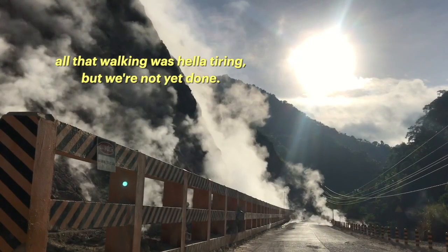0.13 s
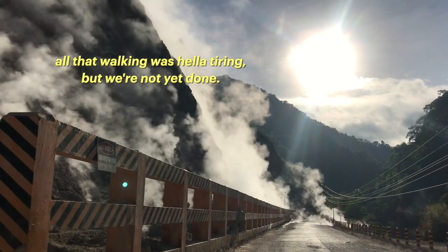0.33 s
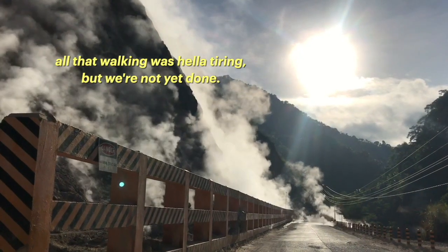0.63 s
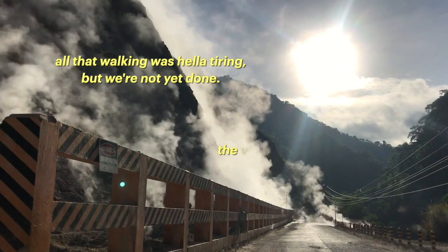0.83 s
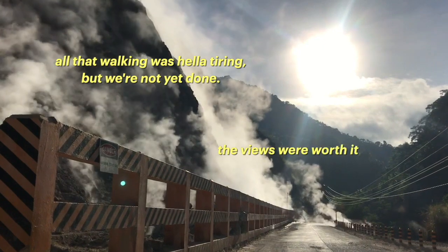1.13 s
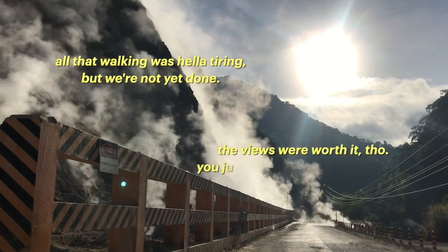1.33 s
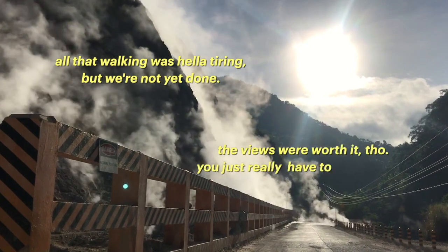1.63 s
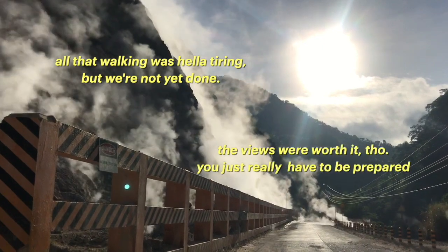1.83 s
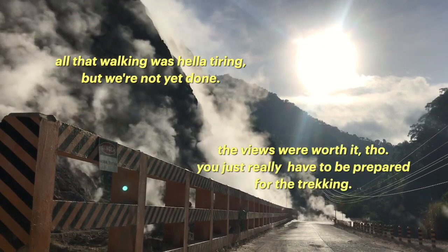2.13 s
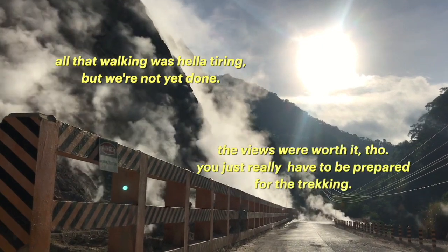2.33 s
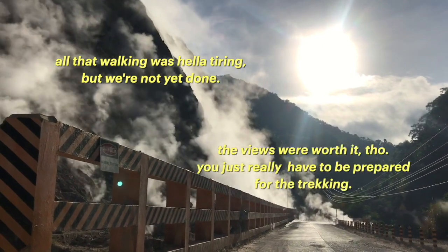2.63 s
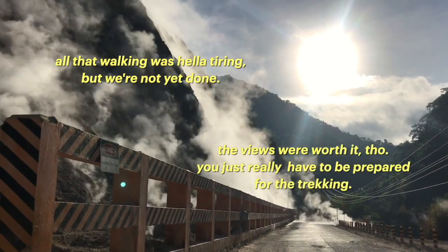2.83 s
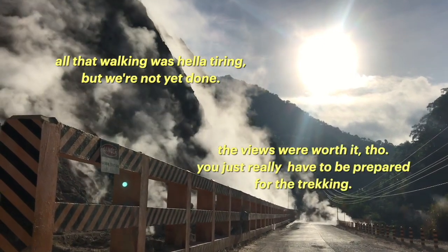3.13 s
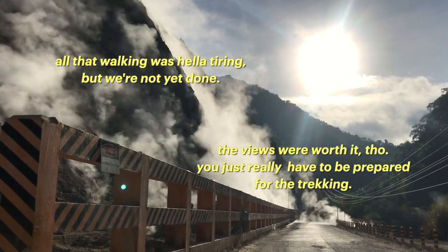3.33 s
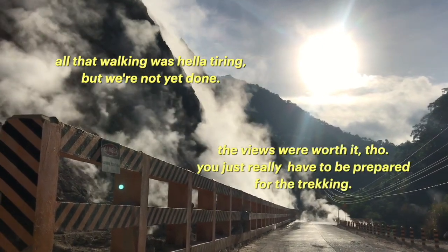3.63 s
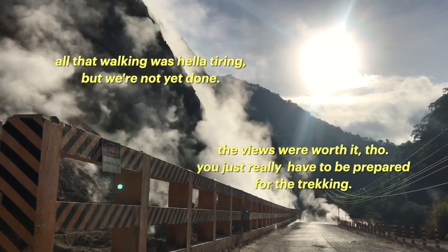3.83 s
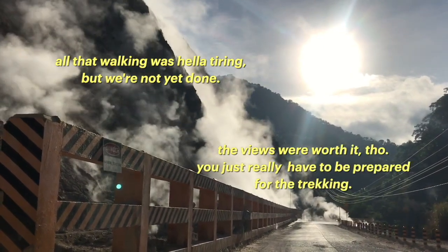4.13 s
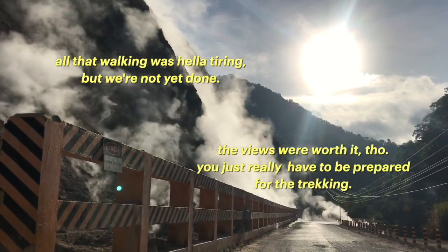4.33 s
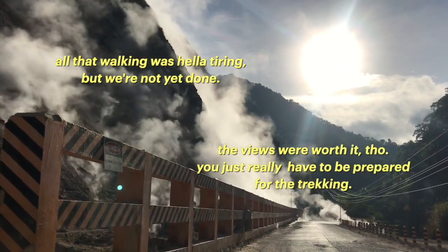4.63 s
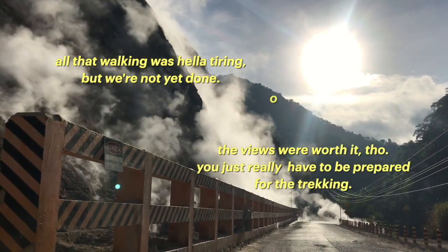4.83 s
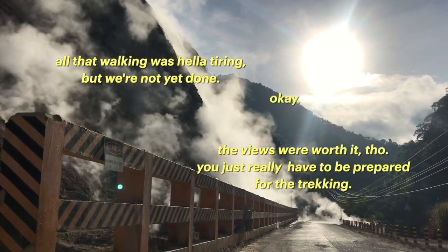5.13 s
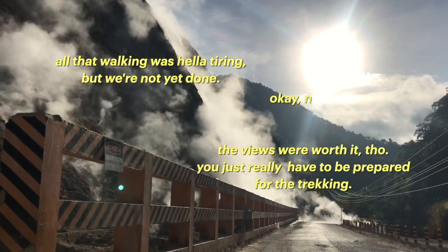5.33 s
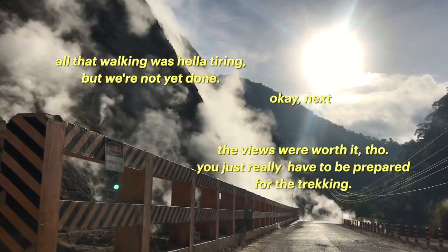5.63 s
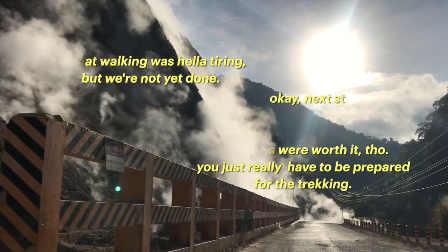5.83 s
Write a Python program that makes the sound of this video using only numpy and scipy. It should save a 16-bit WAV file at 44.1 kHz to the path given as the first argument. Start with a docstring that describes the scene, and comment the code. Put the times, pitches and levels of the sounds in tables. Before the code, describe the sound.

Steam rushes and hisses steadily outdoors over a low idling engine, with ticking water drops and faint bird whistles.

```python
"""A wet surge of spray, then the steady rush of steam from a hillside, heard from beside a mountain road.
The turbulent jets hiss and fizz, and spit drops that tick on the ground close by.
Some way off an engine drones at idle and picks up a little; small birds whistle through the hiss
and echo off the slope. Now and then a puff of air thumps the phone's microphone."""
import sys
import numpy as np
from scipy import signal
from scipy.fft import rfft, irfft
from scipy.io import wavfile

SR = 44100
rng = np.random.default_rng(int(sys.argv[2]) if len(sys.argv) > 2 else 0)


def generate_wav(sig):
    """Save sig (samples, or channels by samples) to the path in sys.argv[1] as 16-bit PCM at SR."""
    pcm = np.round(np.clip(np.atleast_2d(sig).T, -1, 1) * 32767).astype(np.int16)
    wavfile.write(sys.argv[1], SR, pcm)


N = 263277
TIME = np.arange(N) / SR
FREQ = np.maximum(np.arange(N // 2 + 1) * SR / N, 1)
TOP_HZ = 15700  # upper limit of the phone's treble


def undb(db):
    """Decibels to gain."""
    return 10 ** (np.asarray(db) / 20)


def unit(x):
    """Scale to rms 1."""
    return x / np.sqrt(np.mean(x ** 2))


def colour(x, points):
    """Filter by a spectrum of (frequency [Hz], level [dB]) that falls steeply below its first point."""
    hz, db = np.transpose(points)
    gain = undb(np.interp(np.log(FREQ), np.log(hz), db))
    low_cut = np.minimum(FREQ / hz[0], 1) ** 2
    return irfft(rfft(x) * gain * low_cut, N)


def walk(rate):
    """Smooth random drift of rms 1 that changes about rate times a second."""
    return unit(irfft(rfft(rng.standard_normal(N)) / (1 + (FREQ / rate) ** 4), N))


def ring(x, hz, q):
    """Pass x through one resonance."""
    return signal.lfilter(*signal.iirpeak(min(hz, .45 * SR), max(q, 1), fs=SR), x)


def add(out, s, x):
    """Mix x into out at time s."""
    i = int(np.clip(s * SR, 0, N))
    out[i:i + len(x)] += x[:N - i]


def grains(per_second, spread_db, smear_s):
    """Countless tiny impacts, most faint and a few strong, each a short burst of noise."""
    hit = rng.random(N) < per_second / SR
    size = undb(spread_db * np.minimum(rng.standard_exponential(N), 4.5))
    energy = signal.filtfilt([1], [1, -np.exp(-2 / (smear_s * SR))], hit * size ** 2, padtype=None)
    return unit(np.sqrt(energy) * rng.standard_normal(N))


def slope_echo(x, decay_s):
    """The wooded slope scatters a sound into a diffuse tail."""
    t = TIME[:SR // 2]
    tail = rng.standard_normal(len(t)) * np.exp(-t / decay_s)
    return signal.fftconvolve(x, tail / np.linalg.norm(tail))[:N]


def sing(notes, waver, flutter_db, edge_s=.008, floor_db=-8.5):
    """Whistles swell and fade, lifted at the throat's resonance; churning air shakes pitch and level."""
    throat_hz, throat_width_hz, throat_db = 3070, 170, 4.5
    out, tremble, flutter = np.zeros(N), walk(120), walk(76)
    for s, pitch_hz, db, loudest_s, fade_db_per_s in notes:
        t = TIME[:len(pitch_hz)]
        span = (int(s * SR) + np.arange(len(t))) % N
        hz = pitch_hz * (1 + waver * tremble[span])
        accent_db = throat_db * np.exp(-((hz - throat_hz) / throat_width_hz) ** 2)
        swell_db = np.maximum(-fade_db_per_s * abs(t - loudest_s), floor_db)
        edges = np.minimum(np.minimum(t, t[::-1]) / edge_s, 1)
        envelope = unit(edges * undb(accent_db + swell_db + flutter_db * flutter[span]))
        add(out, s, undb(db) * envelope * np.sin(2 * np.pi * np.cumsum(hz) / SR))
    return out


def slides(rows):
    """Straight slides in pitch with no swell, as notes for sing()."""
    for s, length_s, hz, slide_hz, db in rows:
        yield s, hz + slide_hz * np.linspace(-.5, .5, int(length_s * SR)), db, 0, 0


def far_peeps(count=80, db=-58):
    """Birds further up the slope peep faintly at random moments."""
    when, length, pitch, slide = rng.random((count, 4)).T
    length_s, hz, slide_hz = .0275 + .0605 * length, 2400 + 900 * pitch, 1300 * (.3 - slide)
    return slides(zip(when * N / SR, length_s, hz, slide_hz, np.full(count, db)))


def peeps():
    """Short plain calls from the middle distance; the first is the falling end of the near bird's whistle,
    begun before the scene."""
    # peeps behind the steam, the first being the tail of the near bird's whistle: (start [s], length [s], pitch
    # [Hz], slide [Hz], level [dB])
    calls = [(.048, .04, 3000, -420, -43.5), (.245, 0.051, 4000, 160, -52), (.72, 0.02, 3020, 300, -45),
             (.856, .013, 3750, -500, -44), (1.46, .1, 3720, 605, -55), (2.48, .05, 2870, -250, -53),
             (3.15, .08, 2390, -200, -52), (3.3, .06, 3120, -100, -54), (3.455, .03, 3080, 200, -52),
             (3.72, .08, 3200, 0, -55), (3.82, 0.032, 2750, 400, -54), (4.25, 0.037, 2480, 350, -52),
             (5.385, .095, 3340, -30, -49.5), (5.4, .07, 2930, 0, -55), (5.48, .07, 3340, -60, -54.5),
             (5.555, 0.037, 2660, -300, -53), (5.558, .022, 4200, -600, -47), (5.58, .028, 3830, 0, -50.5)]
    return slides(calls)


def chirps(top_hz=4350, bottom_hz=2400, loudest_s=.012, fade_db_per_s=75):
    """A bird in the middle distance repeats a steep dive in pitch that levels off."""
    # falling chirps: (start [s], time constant of the dive [s], level [dB])
    calls = [(3.075, .034, -54), (3.503, .03, -54), (3.934, .03, -53), (4.372, .029, -50.5),
             (4.82, .026, -50.5), (5.278, .027, -52.5), (5.755, .028, -56.5)]
    for s, dive_s, db in calls:
        t = TIME[TIME < 4.2 * dive_s]
        hz = bottom_hz + (top_hz - bottom_hz) * np.exp(-t / dive_s)
        yield s, hz, db, loudest_s, fade_db_per_s


def arched_whistles(depth=.2, half_width_s=.05, rise_s=.035, fade_db_per_s=110):
    """The nearest bird's whistle rises to a crest and falls away."""
    # whistles: (crest time [s], crest pitch [Hz], fall [s], loudest after the crest [s], level [dB])
    calls = [(0.913, 3160, .052, .004, -45), (1.818, 3140, .11, .04, -49.5),
             (2.736, 3130, .125, .024, -46.5), (3.641, 3150, .1, .028, -53.5), (4.548, 3150, .13, .08, -53),
             (5.068, 3620, .075, .026, -51.5)]
    for s, crest_hz, fall_s, loudest_s, db in calls:
        from_crest = TIME[TIME < rise_s + fall_s] - rise_s
        sag = depth * (1 - np.exp(-(from_crest / half_width_s) ** 2))
        yield s - rise_s, crest_hz * (1 - sag), db, rise_s + loudest_s, fade_db_per_s


def birds():
    """The whistler is near and clear, chirps and peeps come broken through the steam, far birds blur."""
    near = sing(arched_whistles(), waver=.005, flutter_db=2.1)
    mid = sing([*chirps(), *peeps()], waver=.011, flutter_db=2.6)
    far = sing(far_peeps(), waver=.013, flutter_db=4.5)
    echo = slope_echo(undb(-8.5) * near + undb(-4.5) * mid, decay_s=.06)
    return near + mid + echo + slope_echo(far, decay_s=.09)


def engine(idle_hz=25.09, pickup_hz=1.7, pickup_start_s=2.45, pickup_length_s=2.15):
    """Only a low exhaust note and rumble carry this far; the throttle lifts and brightens the drone."""
    # throttle: (time [s], opening [0-1])
    throttle = [(0, .42), (.9, .38), (1.5, .12), (2.3, 0), (2.75, .3), (3.05, 1), (3.55, .95), (4.2, .42),
                (4.95, .75), (5.97, .85)]
    # exhaust note at half throttle: (harmonic [multiple of the firing rate], relative level [dB])
    exhaust = [(1, -24), (2, -11.5), (3, -4.5), (4, -0.5), (5, -11), (6, -16), (7, -16.5), (8, -18.5),
               (9, -20)]
    # spectrum of the rough rumble: (frequency [Hz], relative level [dB])
    rumble_spectrum = [(20, -26), (35, -8), (55, -2.5), (80, 1), (110, 0), (150, -2.5), (190, -8.5),
                       (235, -8), (320, -19), (480, -38.5)]
    opening = np.interp(TIME, *np.transpose(throttle))
    note_db, rumble_db = -34 + 3.5 * opening, -36.5 + opening
    tilt_db_per_octave = 4.5 * (opening - .5)
    pickup = np.clip((TIME - pickup_start_s) / pickup_length_s, 0, 1)
    firing_hz = (idle_hz + pickup_hz * pickup) * (1 + .0041 * walk(4.35))
    phase = 2 * np.pi * np.cumsum(firing_hz) / SR
    note = 0
    for k, db in exhaust:
        gain = undb(db + tilt_db_per_octave * np.log2(k / 4)) * (1 + .12 * walk(8.6))
        smear = 1.15 * k ** 2  # pipe and hillside delay each harmonic differently, blurring the firings
        note = note + gain * np.sin(k * phase + smear)
    rumble = unit(colour(rng.standard_normal(N), rumble_spectrum))
    return undb(note_db) * unit(note) + undb(rumble_db) * rumble


def puffs():
    """An eddy crossing the microphone makes a cycle or two of low pressure swing."""
    # eddies at the microphone: (time [s], envelope peak [dB], frequency [Hz], half length [s])
    eddies = [(.454, -27, 50, .012), (.827, -31, 48, .018), (1.1695, -15.8, 88, .0085),
              (4.92, -29.5, 75, .022), (5.215, -27, 79, .022), (5.424, -32, 48, .018)]
    return sum(undb(db) * np.exp(-((TIME - s) / half_s) ** 2) * np.sin(2 * np.pi * hz * (TIME - s))
               for s, db, hz, half_s in eddies)


def far_drops(count=22, peak_db=-35, low_hz=5750, high_hz=13500):
    """Fainter drops land further off at random moments; the bigger ones sound lower."""
    when, size = rng.random((count, 2)).T
    return zip(when * N / SR, np.full(count, peak_db), high_hz * (low_hz / high_hz) ** size)


def splash(landings, droplets=3, within_s=.026):
    """Each drop lands, then the weaker droplets that it throws off land just after it."""
    for s, db, hz in landings:
        yield s, db, hz
        for when, smallness in rng.random((droplets, 2)):
            droplet_hz = min(hz * 2 ** (smallness - .5), TOP_HZ)
            yield s + .003 + within_s * when ** 2, db - 8.5 - 7 * smallness, droplet_hz


def drops(spatter_cycles=10.7, q_per_s=900, tail_db=-27, tail_s=.008):
    """Each drop bursts with a tick and a faint scatter; big low ones last longer and are more pitched."""
    # drops landing close to the microphone: (time [s], peak [dB], brightest frequency [Hz])
    near_drops = [(.26, -33, 9400), (.315, -31, 8500), (.381, -32.5, 4450), (.453, -31, 7000),
                  (.56, -38, 4400), (.667, -29.5, 11500), (.828, -27, 12700), (.887, -31.5, 13000),
                  (1.75, -31.5, 7960), (1.785, -36.5, 1540), (1.929, -32, 9000), (1.991, -34, 14000),
                  (2.204, -29.5, 9000), (2.363, -29.5, 12000), (3.031, -32, 4970), (3.258, -34.5, 5000),
                  (3.419, -32, 6960), (3.438, -28, 12000), (3.646, -32, 7380), (4.375, -33, 12500),
                  (4.811, -33, 11040), (5.044, -30, 13100), (5.049, -26.5, 13500), (5.432, -36, 5600),
                  (5.665, -32, 10500), (5.766, -37, 4900), (5.824, -23.5, 13800), (5.844, -34.5, 10500),
                  (5.929, -34, 4995)]
    out, t = np.zeros(N), TIME[:2048]
    for s, db, hz in splash([*near_drops, *far_drops()]):
        spatter_s = spatter_cycles / hz
        burst = t / spatter_s * np.exp(1 - 2 * t / spatter_s)
        tail = undb(tail_db) * np.exp(-t / tail_s)
        spatter = rng.standard_normal(len(t)) * (burst + tail)
        q = .5 + q_per_s * spatter_s
        tick = ring(ring(spatter, hz, q), hz, q)
        add(out, s, undb(db) * tick / abs(tick).max())
    return out


def surge_strength(hold_s=.28, fade_db_per_s=35):
    """The opening wet surge: 1 while it holds, then dying away."""
    return undb(-fade_db_per_s * np.maximum(TIME - hold_s, 0))


def spray(fizz_db=-53, surge_db=-44):
    """Fine droplets sputter in quick flurries all the time, and crackle thickly during the surge."""
    # spectra of the surge's spray, the bigger droplets and the mist: (frequency [Hz], relative level [dB])
    surge_spectrum = [(700, -36), (1300, 2.5), (1800, -18), (3100, -5.5), (4800, -9.5), (6200, -10),
                      (7500, -11), (9000, -9), (11500, -14), (15500, -18)]
    droplet_spectrum = [(3500, 5), (5500, 6), (7000, -2.5), (10000, -8)]
    mist_spectrum = [(6500, 1.5), (9000, -3), (12500, -2.5), (15500, -15)]
    flurry, fizz = walk(36), 0
    for spectrum in droplet_spectrum, mist_spectrum:
        impacts = grains(per_second=700, spread_db=2.8, smear_s=.0007)
        sputter_db = 2.4 * flurry + 1.6 * walk(10)
        fizz = fizz + unit(colour(impacts * undb(sputter_db), spectrum))
    crackle = colour(grains(per_second=1900, spread_db=2, smear_s=.0021), surge_spectrum)
    return undb(fizz_db) * unit(fizz) + undb(surge_db) * surge_strength() * unit(crackle)


def steam(flow_db=-40.5, surge_lift_db=1.5, flicker_db=1.2, billow_db=1.2):
    """Turbulent jets: each octave flickers alone, the treble billows with the plume, the vents ring."""
    # spectrum of the jets from the roadside: (frequency [Hz], relative level [dB])
    jet_spectrum = [(280, 1.5), (470, -4.5), (610, -1.5), (700, -2.5), (780, -6.5), (1000, -5.5),
                    (1300, -8), (2000, -11.5), (3000, -14), (4800, -20), (6500, -22), (8000, -24),
                    (11500, -36), (15500, -69)]
    # faint hollow tones of the vent mouths: (frequency [Hz], width [Hz], level [dB])
    vents = [(853, 7.3, -57.5), (1302.5, 15, -57.5)]
    jet = rfft(unit(colour(rng.standard_normal(N), jet_spectrum)))
    octave = np.clip(np.log2(FREQ / 250), 0, 6)
    billow, rush = walk(23), 0
    for k in range(7):
        band = irfft(jet * np.maximum(1 - abs(octave - k), 0), N)
        rush = rush + band * undb(flicker_db * walk(24.5) + billow_db * billow * (k / 6) ** 2)
    mouths = sum(undb(db) * unit(ring(rng.standard_normal(N), hz, hz / width)) for hz, width, db in vents)
    return rush * undb(flow_db + surge_lift_db * surge_strength()) + mouths


def scene():
    """Everything as it reaches the roadside, in mono."""
    return (steam() + spray() + drops() + engine() + birds() + puffs())[None]


def record(dry):
    """The microphone port hollows the treble in places, and the phone cuts the top."""
    # hollows of the microphone port: (frequency [Hz], width [Hz], gain [dB])
    hollows = [(4890, 93, -5.5), (7660, 530, -2.5), (10460, 520, -4.5)]
    port_db = sum(db * np.exp(-((FREQ - hz) / width) ** 2) for hz, width, db in hollows)
    coloured = irfft(rfft(dry) * undb(port_db), N)
    return signal.sosfilt(signal.ellip(12, .1, 80, TOP_HZ, fs=SR, output="sos"), coloured)


dry = scene()
out = record(dry)
generate_wav(out)
```